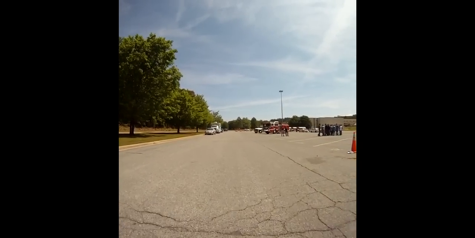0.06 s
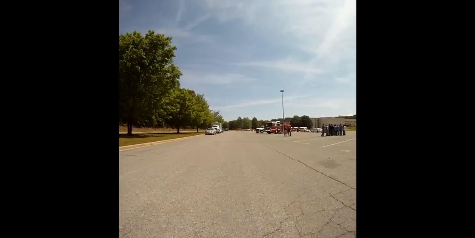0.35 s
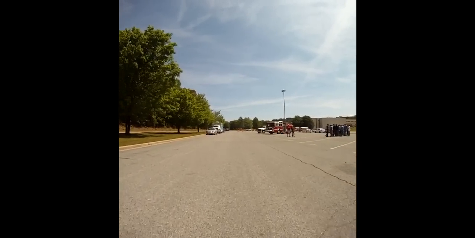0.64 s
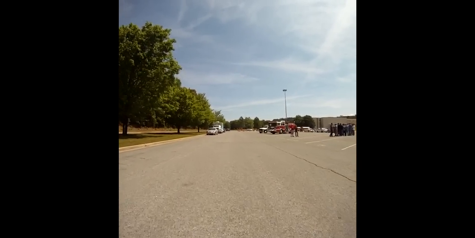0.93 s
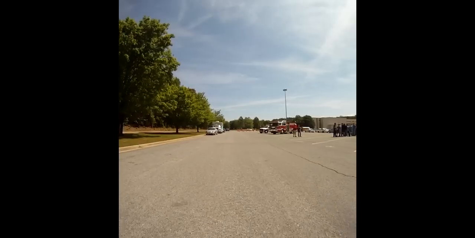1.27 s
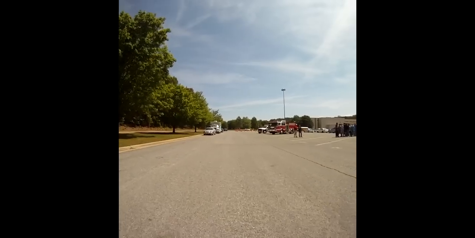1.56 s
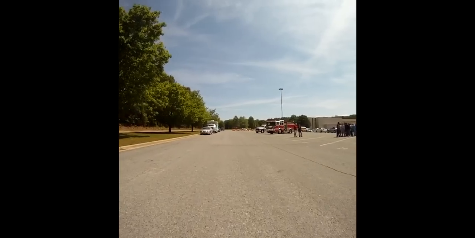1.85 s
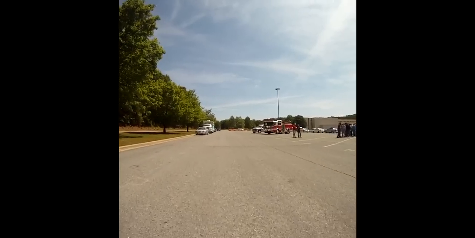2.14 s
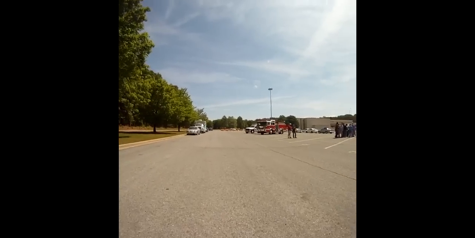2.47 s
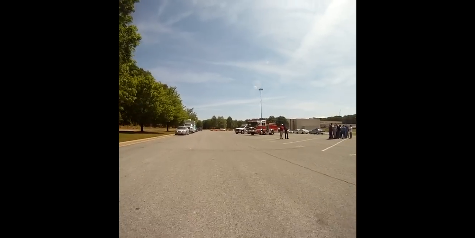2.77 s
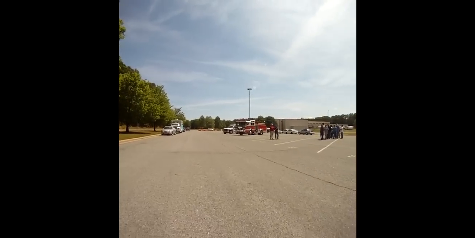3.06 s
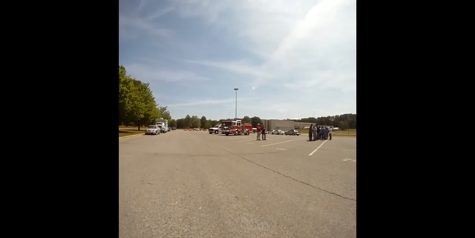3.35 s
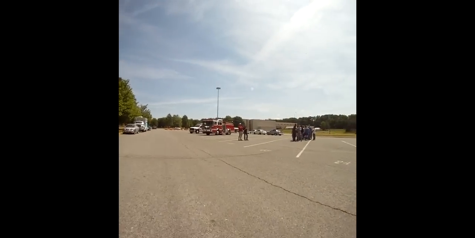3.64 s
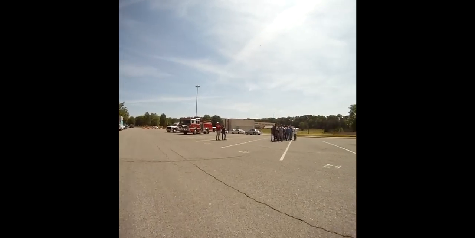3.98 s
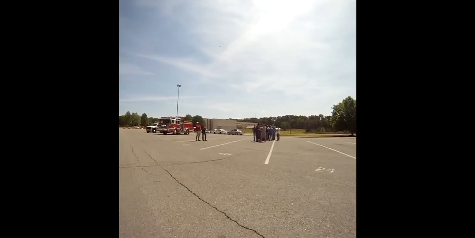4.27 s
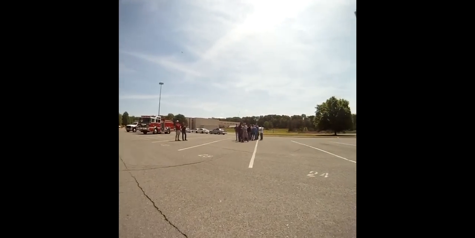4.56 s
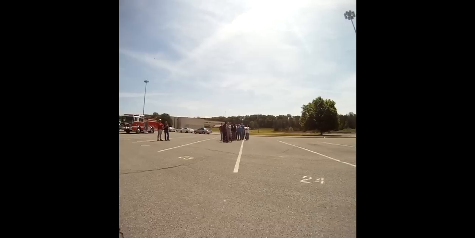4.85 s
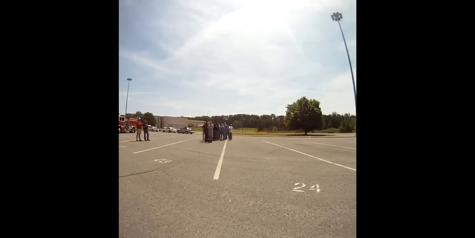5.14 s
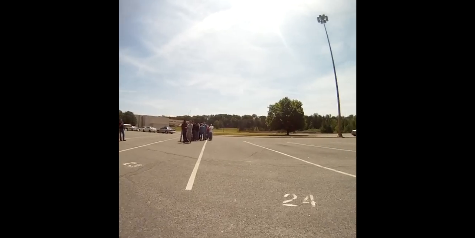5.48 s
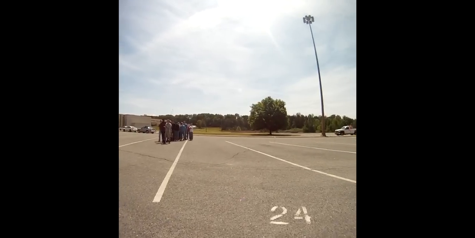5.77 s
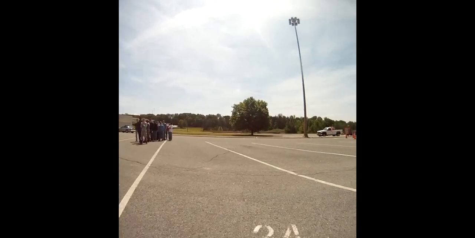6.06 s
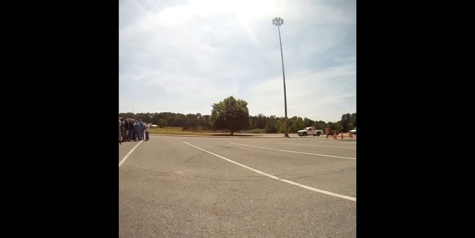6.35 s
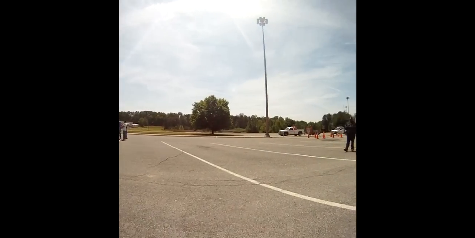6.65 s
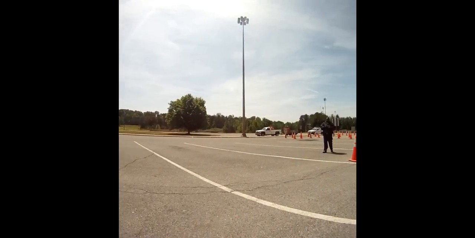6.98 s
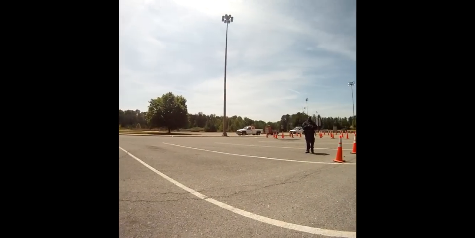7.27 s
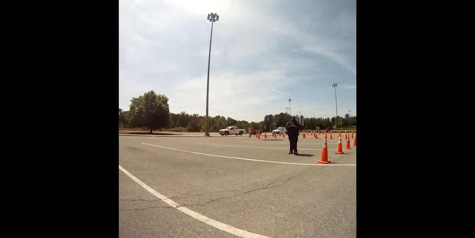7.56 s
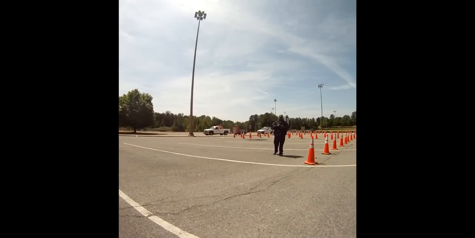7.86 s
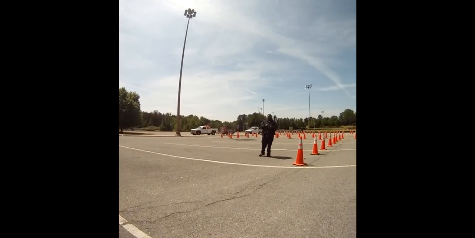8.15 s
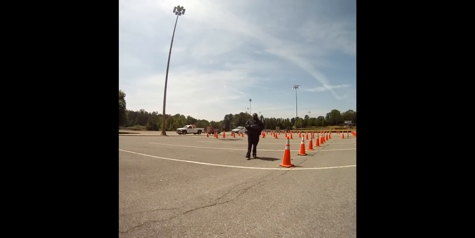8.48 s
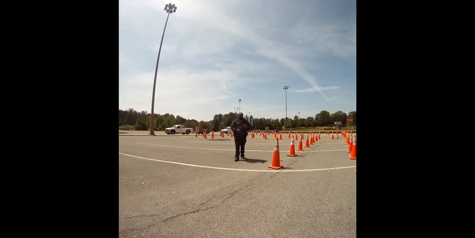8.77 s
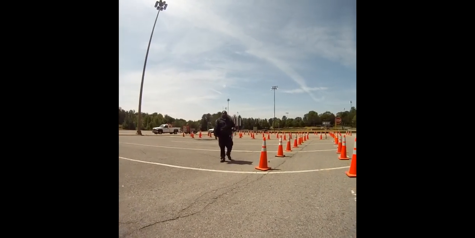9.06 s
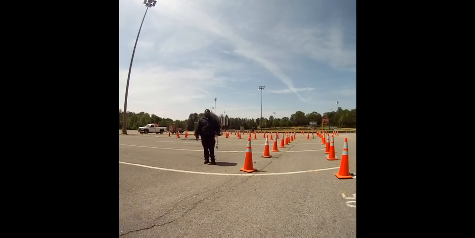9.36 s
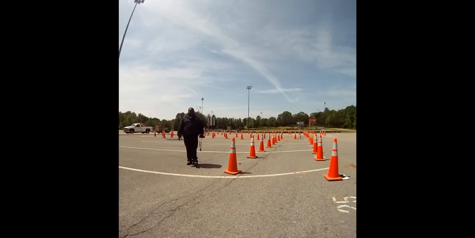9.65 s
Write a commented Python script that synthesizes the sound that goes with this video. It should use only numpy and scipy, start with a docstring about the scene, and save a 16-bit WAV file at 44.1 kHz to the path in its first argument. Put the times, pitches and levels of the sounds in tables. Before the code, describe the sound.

A small electric cart rolls over asphalt in an open lot, heard from a microphone inside a loose hard case. Wind and road shake make a deep, throbbing rumble for the whole ten seconds. The case knocks and chatters on its mount in sharp, dry, uneven clacks, loudest from about 0.6 to 1.6 seconds and staying busy until 3 seconds. Body panels clatter over bumps along the way. Between 3.5 and 5 seconds a dry joint gives a few tiny high squeaks, and a faint motor whine rises briefly near 3.5 seconds. More clusters of knocks come from 6.2 to 7.6 seconds and around 8.3, with one hard knock at 8.8. The rattling eases after 9 seconds, then returns with a last clatter near 9.7. Soft tyre hiss, light crackling grit and a very faint high electronic whistle lie underneath. There is no echo.

```python
"""A loose hard camera case knocks on its mount as a small electric cart rolls over asphalt.
Each jolt rings the case's modes; body panels clatter over bumps and a dry joint squeaks.
Wind and road shake make a deep throbbing rumble. Tyres hiss, grit crackles under them,
the drive whines faintly and the electronics whistle."""
import sys
import numpy as np
from scipy import signal
from scipy.fft import rfft, irfft, next_fast_len
from scipy.io import wavfile
from scipy.ndimage import uniform_filter1d, map_coordinates

SR = 44100
rng = np.random.default_rng(int(sys.argv[2]) if len(sys.argv) > 2 else 0)


def unload_audio(sound):
    """Save the sound as a 16-bit wav file, at the path given as the first command line argument."""
    columns = np.transpose(np.atleast_2d(sound))
    # keep every value between -1 and 1, then stretch to whole-number steps
    steps = np.round(np.clip(columns, -1, 1) * 32767)
    wavfile.write(sys.argv[1], SR, steps.astype(np.int16))


N = 437455

# hard knocks of the case on its mount: t/s, strength/dB
CASE_KNOCKS = [(0.098, -17.5), (0.269, -7), (0.4027, -13), (0.4572, -11), (0.63, -11.5), (0.6914, -1),
               (0.756, -2.5), (0.8154, -12.5), (0.858, -6.5), (0.91, -9), (0.954, -1), (1.022, -14),
               (1.141, -12.5), (1.2322, -3.5), (1.2711, -13), (1.3313, -1), (1.5529, -8.5), (1.6039, -4),
               (1.8078, -12), (1.9859, -5), (2.0227, -10), (2.1173, -9), (2.244, -12.5), (2.4305, -11.5),
               (2.4715, -7.5), (2.607, -10), (2.6836, -11), (2.9586, -12.5), (2.9886, -6.5), (3.0545, -7),
               (3.1525, -14), (3.8467, -8), (3.8681, -10), (4.021, -5), (4.092, -15.5), (4.6253, -10.5),
               (5.1512, -9), (5.2112, -13), (5.372, -11), (5.5163, -16.5), (5.9359, -12.5), (6.239, -9),
               (6.264, -5), (6.403, -16.5), (6.4919, -9), (6.6362, -14.5), (6.764, -12), (6.8636, -10),
               (6.9697, -8), (7.0855, -16), (7.1276, -7.5), (7.2134, -9), (7.2913, -8.5), (7.358, -11),
               (7.6708, -18.5), (7.8826, -14), (8.2477, -15), (8.29, -8.5), (8.3553, -10), (8.3735, -7),
               (8.4177, -14.5), (8.6476, -14), (8.7753, -16), (8.823, -1.5), (8.8694, -9.5), (9.214, -24.5),
               (9.8729, -13.5), (9.9157, -10.5)]


def case_rattle(shake_db, gain_db, tick_db):
    """Hard knocks, chatter and light ticks all ring the same case modes."""
    # case modes, the first being the dry contact crack: f/Hz, gain/dB, t60/s
    case_modes = [(1844, 2, .0035), (823, -18.5, 0.021), (1009, -9.5, 0.019), (1107, -12, 0.032),
                  (1543, -5, 0.035), (1728, 4.5, 0.0069), (1911, -3.5, 0.015), (2620, -25, 0.0049),
                  (2540, -22, 0.11), (2632, -7, 0.015), (3118, -19.5, 0.052), (3611, 5, 0.0056),
                  (3734.4, 3, 0.01), (4820, -23, 0.0062), (7160, -28.5, 0.016), (8300, -7, 0.014),
                  (8600, -4, 0.0026), (9550, -20, 0.036), (10120, -21, 0.023), (10505, -22, 0.039),
                  (12700, -25.5, 0.022), (14600, -21, 0.018), (13600, -30, .03), (14270, -14.5, 0.01)]
    # growth of a mode with knock strength: f/Hz, slope/(dB/dB)
    bite = [(1000, 0.4863), (2500, 0.83), (3600, 1.0), (5000, 1.5), (8300, 1.0), (10000, 0.59),
            (14500, 0.78)]
    pivot_db = -17  # strength at which the slope has no effect
    knock_s, knocks_db = np.transpose(CASE_KNOCKS)
    knocks = np.round(knock_s * SR).astype(int)
    touches, touches_db = chatter()
    ticks, ticks_db = light_ticks(shake_db)
    at = np.r_[knocks, touches, ticks]
    force_db = np.r_[knocks_db, touches_db, ticks_db + tick_db]
    level_of = lambda hz: gain_db + pivot_db + at_hz(bite, hz) * (force_db - pivot_db)
    return strike(case_modes, at, level_of, rebound=0.3, max_lag_s=0.0012, scatter_db=1.5)


def chatter(swing_s=0.017, jitter=0.35, spread_db=3.0):
    """In spells the case touches once per swing of the mount. Returns samples, strengths/dB."""
    # chatter spells: start/s, length/s, strength/dB
    spells = [(0.925, .03, -9.5), (1.283, .045, -11.5), (1.699, .17, -22), (1.925, .15, -19.5),
              (2.292, .27, -26), (2.74, .07, -18.5), (3.097, .30, -18), (3.812, .11, -18),
              (4.611, .055, -18.5), (5.385, .025, -18), (5.777, .02, -14), (6.205, .11, -15.5),
              (7.438, .03, -29.5), (8.012, .035, -22), (8.267, .02, -14.5)]
    touches = []
    for start_s, length_s, db in spells:
        gaps_s = swing_s * (1 + jitter * rng.uniform(-1, 1, 64))
        swings_db = db + spread_db * rng.standard_normal(64)
        since_s = np.r_[0, np.cumsum(gaps_s)]
        touches += [(start_s + s, hit_db) for s, hit_db in zip(since_s, swings_db) if s < length_s]
    touch_s, touch_db = np.transpose(touches)
    at = np.round(touch_s * SR).astype(int)
    landed = ~in_flight(at, flight_s=0.011)
    return at[landed], touch_db[landed]


def light_ticks(shake_db, min_gap_s=0.007, wait_s=0.023, spread_db=5.0, clump_db=4.5):
    """The case ticks in clumps, harder with more shake. Returns samples, strengths/dB."""
    gaps_s = min_gap_s + wait_s * rng.exponential(size=4096)
    at = (np.cumsum(gaps_s) * SR).astype(int)
    at = at[(at < N) & ~in_flight(at, flight_s=0.032)]
    chance_db = spread_db * rng.standard_normal(N) + clump_db * drift(rate_hz=16)
    return at, shake_db[at] + np.minimum(chance_db[at], 10)


def in_flight(at, flight_s):
    """True for samples just before a hard knock, while the case flies free."""
    until_s = np.transpose(CASE_KNOCKS)[0] - at[:, None] / SR
    return np.any((until_s > 0) & (until_s < flight_s), axis=1)


def mount_thumps(gain_db, hz, t60_s, slope):
    """Hard knocks jar the mount into a short dull thump."""
    knock_s, knocks_db = np.transpose(CASE_KNOCKS)
    clicks = np.zeros(N)
    clicks[np.round(knock_s * SR).astype(int)] = from_db(gain_db + slope * knocks_db)
    return ring(clicks, hz, t60_s)


def bodywork(shake_db, touches_per_s, spread_db, clatter_db, chatter_db):
    """Panels touch at uneven gaps: light chatter that flares over bumps."""
    # clatter over bumps: peak t/s, level/dB
    clatter = [(.69, -19.5), (.82, -23.5), (.92, -25), (1.03, -25), (1.33, -21), (3.60, -24), (4.03, -27.5),
               (4.41, -24.5), (4.945, -21), (5.15, -20.5), (5.79, -32), (6.63, -26), (6.915, -25),
               (6.995, -20), (7.195, -20), (7.525, -19.5), (7.635, -25.5), (8.02, -27.5), (8.11, -27.5),
               (8.28, -28), (8.64, -20), (8.885, -31), (9.23, -34.5), (9.315, -29.5), (9.705, -18),
               (9.805, -25)]
    # panel modes: f/Hz, gain/dB, t60/s
    panel_modes = [(802, -23.5, 0.13), (1006, -1, 0.012), (1424, -6, 0.015), (1725, 3, 0.014),
                   (1942, -1.5, 0.017), (2407, -9, 0.018), (3660, -11, 0.01), (8450, -18, 0.0073),
                   (10170, -9.5, 0.011), (13500, -7, 0.0044)]
    at = np.cumsum(rng.uniform(0.3, 1.7, 4096) * SR / touches_per_s).astype(int)
    at = at[at < N]
    bumps = from_db(clatter_db) * bursts(clatter, rise_s=0.0089, fall_s=0.018)
    force = np.hypot(bumps, from_db(shake_db + chatter_db))[at]
    force_db = 20 * np.log10(force) + spread_db * rng.standard_normal(N)[at].clip(-2, 1.5)
    return strike(panel_modes, at, lambda hz: force_db, rebound=0.98, max_lag_s=0.00291, scatter_db=4.5)


def strike(modes, at, level_of, rebound, max_lag_s, scatter_db):
    """Touches at samples `at` ring a body; level_of(hz) gives their dB at each mode."""
    max_touches, count = 4096, len(at)
    lags_s = max_lag_s * rng.random((max_touches, 2))[:count]
    shares = rebound * rng.standard_normal((max_touches, 2))[:count].clip(-1, 1)
    energy_norm = 1 / np.sqrt(1 + np.sum(shares ** 2, axis=1))
    out = np.zeros(N)
    for hz, gain_db, t60_s in modes:
        chance_db = scatter_db * rng.standard_normal(max_touches)[:count]
        size = energy_norm * from_db(level_of(hz) + gain_db + chance_db)
        out = ring(contacts(at, size, lags_s, shares), hz, t60_s) - out  # modes alternate in sign
    return out


def contacts(at, size, lags_s, shares):
    """Each touch is a click and two quick rebounds, which give it its own colour."""
    clicks = np.zeros(N)
    np.add.at(clicks, at.clip(0, N - 1), size)
    for lag_s, share in zip(lags_s.T, shares.T):
        rebound_at = at + (lag_s * SR).astype(int)
        np.add.at(clicks, rebound_at.clip(0, N - 1), size * share)
    return clicks


def frame_ring(rattle, gain_db, t60_s):
    """The frame's dense modes ring on softly after each touch."""
    t = np.arange(int(0.25 * SR)) / SR
    tail = rng.standard_normal(len(t)) * from_db(-60 * t / t60_s)
    return from_db(gain_db) * signal.fftconvolve(rattle, tail / np.linalg.norm(tail))[:N]


def squeaks():
    """Brief rubbing in a dry joint excites two narrow resonances."""
    # rubs: peak t/s, level/dB
    rubs = [(3.608, -33.5), (4.03, -28), (4.425, -36.5), (4.45, -52), (4.962, -31.5)]
    # joint modes: f/Hz, bandwidth/Hz, gain/dB
    joint_modes = [(5135, 82, 0.5), (6880, 96, -3)]
    friction = rng.standard_normal(N)
    tone = 0
    for hz, width_hz, db in joint_modes:
        t60_s = np.log(1000) / (np.pi * width_hz)
        tone += from_db(db) * rms_one(ring(friction, hz, t60_s))
    return tone * bursts(rubs, rise_s=0.0055, fall_s=0.0099)


def rumble(gain_db, evenness, heave, squash, knee):
    """Wind and road shake the mount near 60 Hz; the widest swings are softly limited and thud."""
    # rumble spectrum: f/Hz, density/dB
    spectrum = [(12, -53), (28, -31.5), (44, -21.5), (53, -7), (60, 3.5), (67, -6.5), (76, -4.5),
                (90, -14.5), (110, -28.5), (140, -39.5), (300, -73.5)]
    # widest heaves of the mount: t/s
    heaves_s = [1.131, 1.711, 2.29, 3.102, 3.75, 3.898, 4.062, 4.41, 4.961, 5.19, 5.838, 6.412, 6.77, 7.148,
                7.301, 7.74]
    t = np.arange(N) / SR
    noise = colour(rng.standard_normal(N), spectrum)
    envelope = np.abs(signal.hilbert(noise, next_fast_len(N)))[:N]
    usual = rms_one(noise / uniform_filter1d(envelope, int(0.061 * SR)) ** evenness)
    wide = heave * noise / (uniform_filter1d(envelope, int(0.0066 * SR)) + 0.0064)
    jolt = np.minimum(sum(np.exp(-((t - s) / 0.011) ** 2) for s in heaves_s), 1)
    swing = (1 - jolt) * usual + jolt * wide
    return from_db(gain_db) * swing / (1 + np.abs(squash * swing) ** knee) ** (1 / knee)  # soft limit


def tyres(level_db):
    """Rubber rolling on asphalt: soft steady noise."""
    # rolling spectrum: f/Hz, density/dB
    spectrum = [(200, 1), (380, 2), (450, -10.5), (590, 0.5), (720, -15), (900, 2.5), (1500, -6.5),
                (3000, -16), (5000, -44), (7500, -47), (10000, -29), (16000, -37)]
    return from_db(level_db) * colour(rng.standard_normal(N), spectrum)


def grit(shake_db, gain_db, slope, grains_per_s=70, spread_db=5.0, decay_s=0.00084):
    """Loose grains crack under the tyres, louder on rough road."""
    # crack spectrum: f/Hz, density/dB
    spectrum = [(1500, -20), (3500, 0.5), (5200, -1.5), (7300, -3.5), (9000, -14), (14000, -18)]
    onsets = rng.random(N) < grains_per_s / SR
    size = from_db(spread_db * rng.standard_normal(N).clip(-2, 2))
    envelope = signal.lfilter([1], [1, -np.exp(-1 / (decay_s * SR))], onsets * size + 1e-18)
    cracks = colour(envelope * rng.standard_normal(N), spectrum)
    return from_db(gain_db + slope * (shake_db - shake_db.mean())) * cracks


def drive_whine(wobble, waver_db):
    """Motor and gears whine at multiples of their speed."""
    # drive curve: t/s, base f/Hz, level/dB
    curve = [(0, 274.8, -44), (3.0, 279, -62), (3.47, 274.5, -36), (3.73, 272, -39), (3.95, 266, -49.5),
             (9.92, 273.4, -50)]
    # partials: multiple of base f, gain/dB
    orders = [(2, -23), (3, -6), (4, -3)]
    base_hz, level_db = in_time(curve)
    phase = 2 * np.pi * np.cumsum(base_hz * (1 + wobble * drift(rate_hz=30))) / SR
    return sum(from_db(level_db + db + waver_db * drift(rate_hz=16)) * np.sin(order * phase)
               for order, db in orders)


def sliding_whine(wobble):
    """Three faint high partials slide up together and fall away."""
    # whine curve: t/s, base f/Hz, level/dB
    curve = [(7.7, 344.4, -100), (7.95, 352.3, -55), (8.15, 345, -64), (8.4, 398, -59), (8.65, 390, -75),
             (8.92, 401, -62), (9.03, 382, -56), (9.2, 360.6, -74), (9.4, 360, -100)]
    base_hz, level_db = in_time(curve)
    phase = 2 * np.pi * np.cumsum(base_hz * (1 + wobble * drift(rate_hz=50))) / SR
    return from_db(level_db) * sum(np.sin(order * phase) for order in (6, 7, 8))


def whistle():
    """The electronics give two close steady tones in the high treble."""
    # tones: f/Hz, rms level/dB
    tones = [(11951, -61.5), (12074, -58.5)]
    t = np.arange(N) / SR
    return sum(from_db(db) * np.sqrt(2) * np.sin(2 * np.pi * hz * t) for hz, db in tones)


def enclosure(x):
    """The enclosed microphone has narrow dips in its treble."""
    # response dips: f/Hz, Q
    dips = [(6000, 8.5), (11700, 63), (12450, 27)]
    for hz, q in dips:
        x = signal.lfilter(*signal.iirnotch(hz, q, fs=SR), x)
    return x


def from_db(db):
    """Decibels to gain."""
    return 10 ** (np.asarray(db) / 20)


def rms_one(x):
    """Scale to rms 1."""
    return x / np.sqrt(np.mean(x ** 2) + 1e-20)


def in_time(rows):
    """Each value column of a time curve at every sample."""
    times_s, *columns = np.transpose(rows)
    return [np.interp(np.arange(N) / SR, times_s, column) for column in columns]


def at_hz(points, hz):
    """Interpolate on a log-frequency axis."""
    points_hz, values = np.transpose(points)
    return np.interp(np.log(hz + 1e-9), np.log(points_hz), values)


def colour(x, spectrum):
    """Filter by a spectrum; rms 1."""
    size = next_fast_len(N)
    hz = np.arange(size // 2 + 1) * SR / size
    return rms_one(irfft(rfft(x, size) * from_db(at_hz(spectrum, hz)), size)[:N])


def drift(rate_hz):
    """Random wander, linear between knots at rate_hz; rms 1."""
    knots = rng.standard_normal(4096)
    return rms_one(map_coordinates(knots, [np.arange(N) * rate_hz / SR], order=1, mode="wrap"))


def ring(clicks, hz, t60_s):
    """One mode: a unit click starts a decaying sine of height 1."""
    radius, angle = from_db(-60 / (t60_s * SR)), 2 * np.pi * hz / SR
    return signal.lfilter([0, np.sin(angle)], [1, -2 * radius * np.cos(angle), radius ** 2], clicks + 1e-18)


def bursts(peaks, rise_s, fall_s):
    """Envelope that swells to each (t/s, level/dB) and dies away."""
    t = np.arange(0, N, 16) / SR
    power = sum(from_db(2 * db) * np.exp(-2 * np.maximum((s - t) / rise_s, (t - s) / fall_s))
                for s, db in peaks)
    return np.interp(np.arange(N) / SR, t, np.sqrt(power))


def scene():
    """All sources at one microphone inside the case; the open lot has no echo."""
    # road shake, as strength of the light rattling: t/s, level/dB
    shake = [(0, -29), (0.9, -23), (1.45, -30), (2.4, -21.5), (2.88, -28), (3.25, -23), (3.65, -32),
             (3.95, -27), (4.3, -35), (5.0, -31.5), (5.25, -24), (5.65, -31), (6.4, -29), (7.45, -26),
             (7.85, -31.5), (8.3, -22), (9.0, -53), (9.92, -38)]
    shake_db, = in_time(shake)
    rattle = case_rattle(shake_db, gain_db=2.5, tick_db=1.5)
    rattle += bodywork(shake_db, touches_per_s=240, spread_db=2.5, clatter_db=3.5, chatter_db=-13.5)
    rattle += frame_ring(rattle, gain_db=-11, t60_s=0.06)
    low_cut = signal.butter(4, 720, "high", fs=SR, output="sos")  # light parts radiate no bass
    out = signal.sosfilt(low_cut, rattle)
    out += mount_thumps(gain_db=-22.5, hz=270, t60_s=0.015, slope=1.6) + squeaks()
    out += tyres(level_db=-47.0) + grit(shake_db, gain_db=-60, slope=0.9)
    out += drive_whine(wobble=0.0035, waver_db=4.0) + sliding_whine(wobble=0.0031)
    out += rumble(gain_db=-16.0, evenness=0.41, heave=2.98, squash=0.44, knee=6.3)
    return (enclosure(out) + whistle())[None]


def record(dry):
    """The hardest knocks overload; a steep low-pass cuts the top."""
    stop_db, stop_hz = 80, 16400
    low_pass = signal.cheby2(16, stop_db, stop_hz, fs=SR, output="sos")
    return signal.sosfilt(low_pass, np.clip(dry, -1, 1))


dry = scene()
out = record(dry)
unload_audio(out)
```